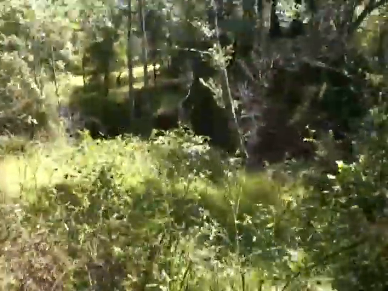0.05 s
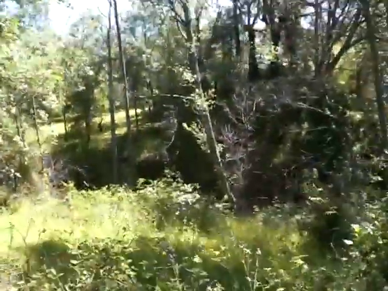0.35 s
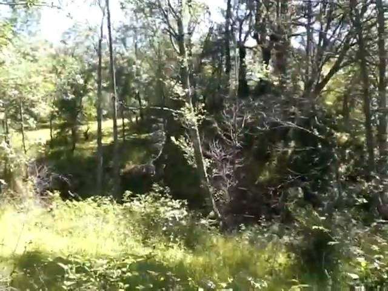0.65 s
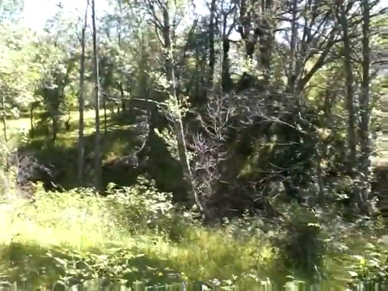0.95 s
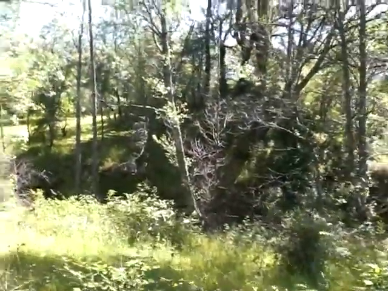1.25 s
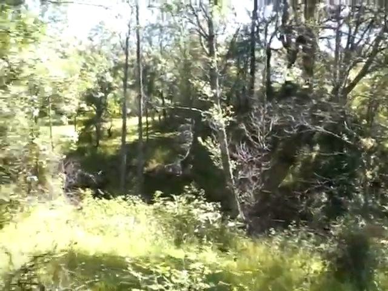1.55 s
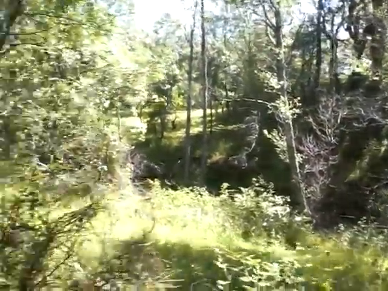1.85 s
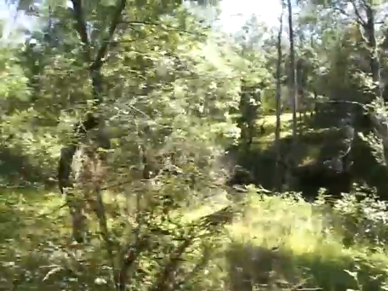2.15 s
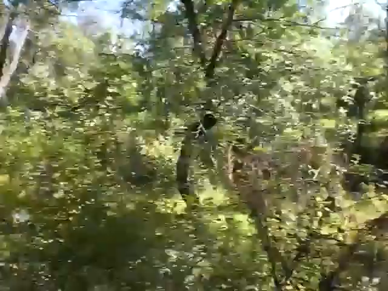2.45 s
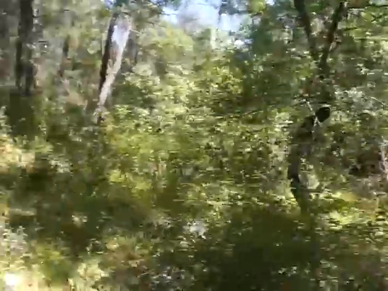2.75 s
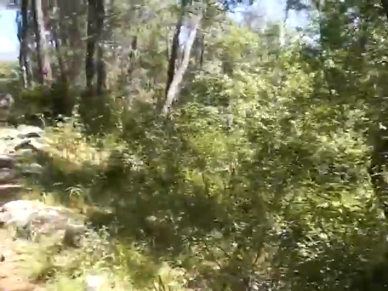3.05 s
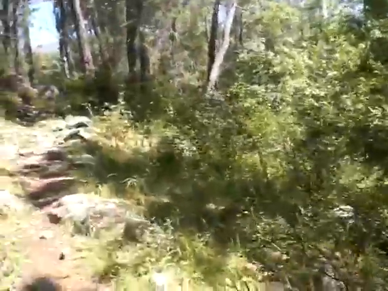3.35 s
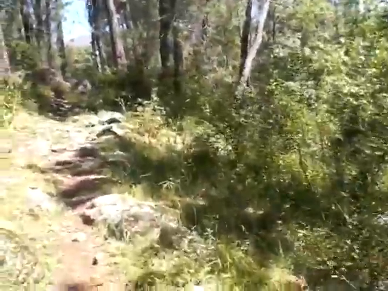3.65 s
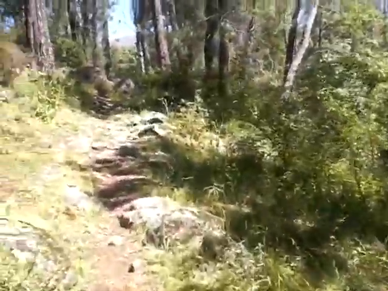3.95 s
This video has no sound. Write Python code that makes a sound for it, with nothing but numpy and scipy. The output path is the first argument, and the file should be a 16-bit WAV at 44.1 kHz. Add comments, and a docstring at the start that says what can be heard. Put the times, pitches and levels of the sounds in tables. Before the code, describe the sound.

Thin, high birdsong echoes softly among trees over faint chirps and a low, steady hush.

```python
"""Birdsong in woodland

A small bird sings a thin, high phrase of gliding whistles; the trunks scatter it into a soft echo.
A second bird repeats a faint arched chirp, others call far off, and an insect's buzz swells and stops.
Close by, twigs tick, leaves rustle and handling makes soft knocks, over a low rumble and an even hush."""
import sys
import numpy as np
from scipy import signal
from scipy.fft import rfft, irfft, next_fast_len
from scipy.io import wavfile
from scipy.ndimage import uniform_filter1d, map_coordinates

SR = 44100
rng = np.random.default_rng(int(sys.argv[2]) if len(sys.argv) > 2 else 0)


def waveform_to_disk(signal):
    """Save audio, clipped to [-1, 1], as 16-bit WAV at the path in sys.argv[1]."""
    frames = np.transpose(np.atleast_2d(signal))
    scaled = np.clip(frames, -1, 1) * 32767
    samples = np.round(scaled).astype(np.int16)
    wavfile.write(sys.argv[1], SR, samples)


N = 176400
TIME_S = np.arange(N) / SR


def amp(db):
    """Turn decibels into a number to multiply a sound by."""
    return 10 ** (np.asarray(db) / 20)


def unit(x):
    """Scale a signal to an average (rms) strength of 1."""
    return x / np.sqrt(np.mean(x ** 2) + 1e-20)


def along(points, hz):
    """Read between (pitch_hz, value) points on a log pitch scale."""
    pitches, values = np.transpose(points)
    return np.interp(np.log(hz + 1), np.log(pitches + 1), values)


def level(points):
    """A loudness curve through (time_s, level_db) points."""
    return amp(np.interp(TIME_S, *np.transpose(points)))


def wobble(rate_hz):
    """A smooth curve through rate_hz random values a second."""
    return map_coordinates(rng.standard_normal(4096), [TIME_S * rate_hz], mode="wrap")


def filtered(x, response):
    """Turn each frequency of x up or down by response(hz)."""
    size = next_fast_len(N + SR // 2)
    return irfft(rfft(x, size) * response(np.fft.rfftfreq(size, 1 / SR)), size)[..., :N]


def noise(colour):
    """Noise of strength 1, shaped by (pitch_hz, level_db) points."""
    return unit(filtered(rng.standard_normal(N), lambda hz: amp(along(colour, hz))))


def since(start_s):
    """Seconds since start_s, zero before it."""
    return np.maximum(TIME_S - start_s, 0)


def whistles(notes, edge_s=0.0024, waver_share=0.004, flutter_db=1.7):
    """Nearly pure tones that glide through their points with a slight waver."""
    out = np.zeros(N)
    waver = 1 + waver_share * wobble(rate_hz=190)
    flutter = flutter_db * wobble(rate_hz=190)
    for note in notes:
        times, hz, db = np.transpose(note)
        times = np.sort(times)
        on = (TIME_S >= times[0]) & (TIME_S <= times[-1])
        if on.any():
            t = TIME_S[on]
            glide_hz = uniform_filter1d(np.interp(t, times, hz), size=180, mode="nearest")
            phase = 2 * np.pi * np.cumsum(glide_hz * waver[on]) / SR
            fade = np.clip(np.minimum(t - times[0], times[-1] - t) / edge_s, 0, 1)
            out[on] += fade * amp(np.interp(t, times, db) + flutter[on]) * np.sin(phase)
    return out


def among_trees(x, near_db, trunks_db, far_db=-14):
    """A sound plus its echoes from near branches, trunks all around and far trees."""
    # how long the trunks' echo takes to fade by 60 dB: pitch_hz, fade_s
    echo_fade = [(1000, 0.55), (3200, 0.69), (6500, 0.65)]
    delay_s, rise_s = 0.0093, 0.0092
    near_spread_s, far_delay_s, far_spread_s = 0.016, 0.097, 0.008
    hz, frame_s, spectrum = signal.stft(rng.standard_normal(SR), SR, nperseg=256)
    swell = np.clip((frame_s - delay_s) / rise_s, 0, 1)
    fade = amp(-60 * frame_s / along(echo_fade, hz)[:, None])
    trunks = signal.istft(spectrum * swell * fade, SR, nperseg=256)[1][:SR]
    t = TIME_S[:SR]
    near = rng.standard_normal(SR) * t * np.exp(-2 * t / near_spread_s)
    far = rng.standard_normal(SR) * np.exp(-((t - far_delay_s) / far_spread_s) ** 2)
    parts = [(near, near_db), (trunks, trunks_db), (far, far_db)]
    echo = sum(amp(db) * part / np.linalg.norm(part) for part, db in parts)
    return x + signal.fftconvolve(x, echo)[:N]


def background(hush_lift_db=0.94, hush_drift_db=0.58, rumble_db=-56.5, rumble_drift_db=0.98):
    """An even hush, a low rumble and the hiss of distant leaves, all shaped noise."""
    # the tone of each noise: pitch_hz, level_db
    hush_colour = [(150, -34), (250, -5), (347, -3), (427, -2), (466, -1.5), (692, -3), (781, -2),
                   (882, -2.5), (1180, -2.5), (1850, -7.5), (1990, -6.5), (3060, -11), (4790, -11),
                   (5790, -14.5), (15500, -24.5)]
    rumble_colour = [(12, -30), (22, -6), (33, -6), (50, -0.5), (80, 1), (98, -.5), (120, 3), (150, 1),
                     (175, -3), (240, -5.5), (330, -13.5), (660, -60)]
    hiss_colour = [(1500, -12), (3000, 4), (4800, -4.5), (7000, -7.5), (10000, -20)]
    # how the hush and the hiss rise and fall: time_s, level_db
    hush_curve = [(0.0, -53), (0.19, -53), (0.66, -53.5), (0.86, -53), (1.82, -53.5), (3.45, -53),
                  (4.0, -53.5)]
    hiss_curve = [(0, -58), (1.5, -59), (2.8, -59), (3.3, -66), (4, -64)]
    hush = level(hush_curve) * amp(hush_lift_db + hush_drift_db * wobble(7.01)) * noise(hush_colour)
    rumble = amp(rumble_db + rumble_drift_db * wobble(6.06)) * noise(rumble_colour)
    return hush + rumble + level(hiss_curve) * noise(hiss_colour)


def other_birds():
    """Birds whistle far off, and one repeats a chirp that rises and falls in pitch."""
    # scattered calls, one list of points each: time_s, pitch_hz, level_db
    calls = [
        [(0.0, 3055, -33), (0.017, 3300, -49), (0.033, 3150, -38), (0.050, 2506, -46), (0.066, 1970, -56)],
        [(0.28, 7150, -60), (0.33, 6700, -65), (0.42, 6800, -62)],
        [(1.996, 6600, -56), (2.008, 7100, -55), (2.04, 6800, -58)],
        [(2.145, 6950, -60), (2.18, 6450, -61)],
        [(2.288, 6550, -60), (2.312, 7100, -57)],
        [(2.61, 3410, -68), (2.66, 3680, -54), (2.69, 3680, -56)],
        [(2.734, 3590, -54), (2.745, 3384, -46.5), (2.757, 2850, -52)],
        [(2.772, 2730, -50), (2.782, 3140, -52), (2.796, 4000, -45.5)],
        [(2.815, 4260, -48), (2.83, 3380, -58), (2.89, 3310, -54.5)],
        [(3.0, 2846, -53), (3.02, 3400, -61), (3.08, 3700, -58)],
        [(3.50, 3600, -62), (3.535, 3110, -57), (3.565, 3020, -57)],
    ]
    # the row of chirps, louder at the end: start_s, level_db
    chirps = [(1.719, -51.5), (1.833, -52), (1.948, -51), (2.064, -50), (2.178, -52), (2.296, -51),
              (2.413, -48.5), (2.534, -46)]
    # the shape of one chirp: after_start_s, pitch_hz, relative_db
    arch = [(0, 2852, -4), (.012, 3396, -1.5), (.020, 4092, -17), (.028, 3500, -3.5), (.043, 2786, -0.5)]
    arches = [np.array(arch) + [start_s, 0, db] for start_s, db in chirps]
    return among_trees(whistles(arches + calls), near_db=-15, trunks_db=-5.5)


def foliage(grain_db=1.5, grain_hz=600, snap_fade_s=0.0047):
    """Brushed leaves make grainy swishes with a lower crunch; dry ones snap."""
    # brushes of leaves: peak_s, rise_s, fall_s, level_db, crunch_relative_db
    rustles = [(2.72, 0.06, 0.18, -56, 0), (3.05, .02, .03, -63, -3), (3.14, .06, .025, -59, -1),
               (3.23, 0.019, 0.059, -63, -3), (3.435, 0.049, 0.033, -62, 10), (3.76, 0.13, .06, -62.5, -4)]
    # snaps of dry leaves: start_s, level_db
    leaf_snaps = [(.022, -44), (.058, -37), (3.218, -54), (3.433, -53), (3.497, -47)]
    # the tone of the bright swish and of the crunch: pitch_hz, level_db
    leaf_colour = [(3000, -15), (6000, 6), (9000, -2), (14000, 0), (16000, -3)]
    crunch_colour = [(300, 3), (1000, 1.5), (3500, 4), (5500, -1), (8000, -26)]
    leaf, crunch = noise(leaf_colour), noise(crunch_colour)
    swishes = np.zeros(N)
    for peak_s, rise_s, fall_s, db, crunch_db in rustles:
        width_s = np.where(TIME_S < peak_s, rise_s, fall_s)
        swell = np.exp(-((TIME_S - peak_s) / width_s) ** 2)
        swishes += amp(db) * swell * (leaf + amp(crunch_db) * crunch)
    snaps = sum((TIME_S >= s) * amp(db - 60 * since(s) / snap_fade_s) for s, db in leaf_snaps)
    grain = unit(amp(grain_db * wobble(grain_hz)))
    return swishes * grain + snaps * leaf


def knocks(fade_s=0.047):
    """Soft bumps of handling, each a low tone that dies quickly."""
    # the bumps: start_s, level_db, pitch_hz
    bumps = [(.766, -45, 251), (.77, -41, 110), (3.004, -41, 490)]
    return sum(amp(db - 60 * since(s) / fade_s) * np.sin(2 * np.pi * hz * since(s))
               for s, db, hz in bumps)


def twigs():
    """Each twig rings very briefly at several pitches at once, making a dry tick."""
    # the ticks: start_s, level_db, pitch_hz
    ticks = [(.8855, -37.5, 890), (.9115, -33, 840), (.9355, -33, 1200), (1.024, -37, 750),
             (1.0358, -34.5, 1800), (1.054, -40, 890), (1.662, -31.5, 880), (3.0035, -34.5, 1250),
             (3.008, -35, 950), (3.0355, -33.5, 900), (3.431, -40, 1100), (3.5825, -32.5, 1300)]
    # the tones a twig rings with: pitch_multiple, relative_db, fade_s (to fall 60 dB)
    tones = [(.55, -2.5, 0.0092), (1, 2, 0.009), (1.6, 0, 0.0044), (2.4, -6, 0.0037)]
    out, t = np.zeros(N + SR), TIME_S[:SR // 20]
    for start_s, db, hz in ticks:
        for k, (multiple, tone_db, fade_s) in enumerate(tones):
            ring = amp(db + tone_db - 60 * t / fade_s) * np.sin(2 * np.pi * hz * multiple * t)
            out[round(start_s * SR):][:len(t)] += (-1) ** k * ring  # every other tone is flipped
    return out[:N]


def drone():
    """A low band of noise that comes and goes."""
    # its tone: pitch_hz, level_db
    colour = [(60, -37), (100, -11), (118, 1), (152, -0.5), (195, -7), (260, -30.5)]
    # its rise and fall: time_s, level_db
    swell = [(1.1, -74), (1.6, -58.5), (2.05, -56.5), (2.25, -77)]
    return level(swell) * noise(colour)


def insect(rates_hz=(106, 123.5), sharpness=3.2):
    """Two streams of fast pulses drift in and out of step, chopping high noise into a rasp."""
    # the buzz swells and stops: time_s, level_db
    swell = [(1.1, -75), (1.5, -64.5), (1.8, -60.3), (2.08, -60.5), (2.13, -83)]
    # its tone: pitch_hz, level_db
    colour = [(6000, -30), (9000, -15), (10500, -7), (11700, 1), (12900, -6), (14000, -4), (16000, -6.5)]
    pulses = sum(np.exp(sharpness * np.cos(2 * np.pi * hz * TIME_S + wobble(4.95))) for hz in rates_hz)
    return level(swell) * unit(pulses) * noise(colour)


def singer():
    """A small bird whistles its high phrase, and the trees echo it."""
    # the song, one list of points per whistle: time_s, pitch_hz, level_db
    song = [
        [(1.873, 6400, -58), (1.887, 5550, -48), (1.905, 5540, -46), (1.95, 5805, -45.5), (1.972, 5790, -49)],
        [(2.150, 5460, -58), (2.164, 4915, -47), (2.186, 4900, -52), (2.202, 5110, -44), (2.228, 5400, -45.5),
         (2.25, 5450, -55)],
        [(2.316, 6400, -58), (2.329, 5270, -45), (2.341, 4850, -46), (2.358, 4470, -50)],
        [(2.372, 4970, -52), (2.388, 5480, -48.5), (2.418, 5550, -46)],
        [(2.442, 6050, -48), (2.451, 6360, -46), (2.466, 6290, -49), (2.478, 5650, -45), (2.488, 6300, -47),
         (2.497, 5500, -55)],
        [(2.508, 5930, -44), (2.526, 5460, -46), (2.538, 4950, -46)],
        [(2.586, 6480, -53), (2.596, 7480, -44), (2.602, 7620, -48.5), (2.613, 7300, -42.5), (2.629, 6130, -49),
         (2.642, 6080, -45)],
        [(2.688, 6440, -48), (2.701, 7080, -43), (2.714, 6920, -46), (2.763, 6390, -42.5), (2.785, 5680, -41.5),
         (2.802, 5030, -48)],
        [(2.864, 7400, -51), (2.880, 6130, -49), (2.896, 5830, -38), (2.913, 5830, -39), (2.924, 6010, -41.5),
         (2.939, 6080, -38), (2.951, 6950, -51), (2.964, 6200, -48)],
        [(2.968, 6150, -40), (2.980, 7200, -51), (2.996, 6100, -43), (3.007, 7150, -50), (3.024, 6050, -46)],
    ]
    return among_trees(whistles(song), near_db=-9.5, trunks_db=-3.5)


def scene():
    """Add up all the sounds, the same for left and right."""
    mix = background() + other_birds() + foliage() + knocks() + twigs() + drone() + insect() + singer()
    return np.array([mix, mix])


def record(dry):
    """Cut away the very highest treble."""
    top_hz = 15700
    return filtered(dry, lambda hz: hz < top_hz)


dry = scene()
out = record(dry)
waveform_to_disk(out)
```